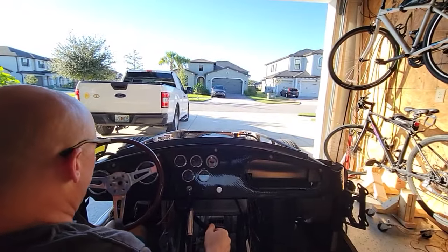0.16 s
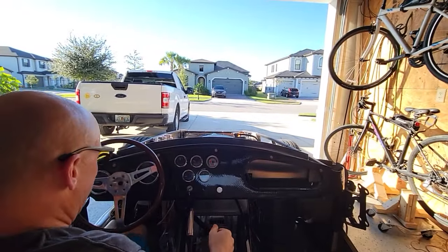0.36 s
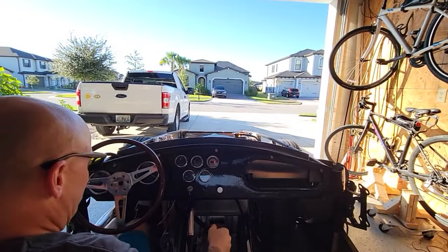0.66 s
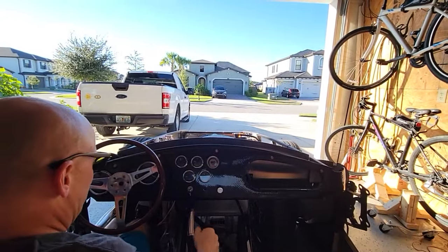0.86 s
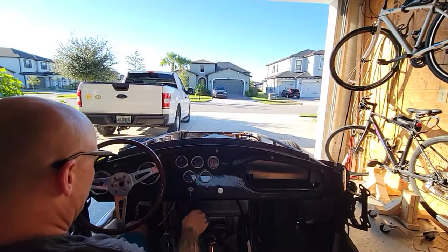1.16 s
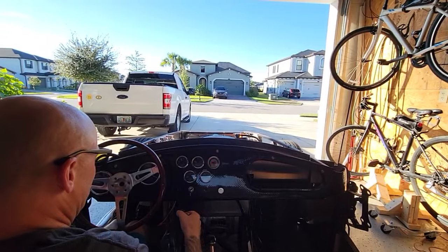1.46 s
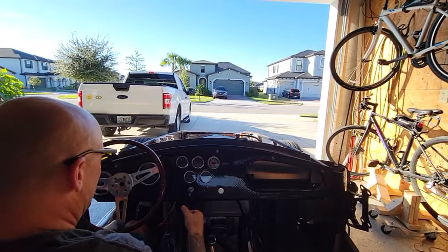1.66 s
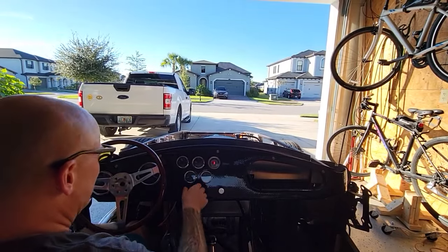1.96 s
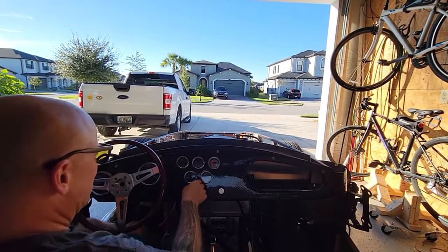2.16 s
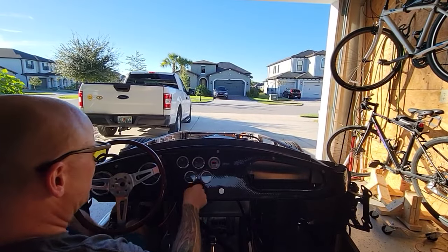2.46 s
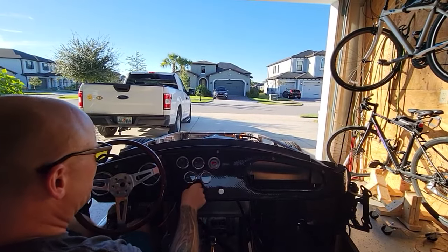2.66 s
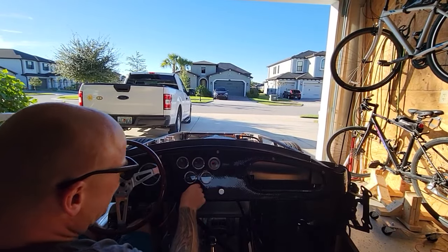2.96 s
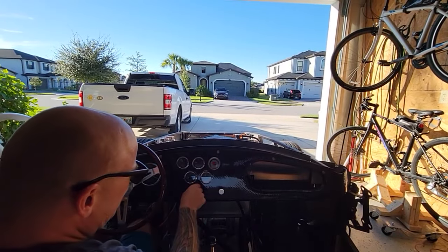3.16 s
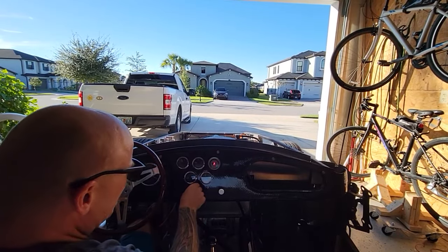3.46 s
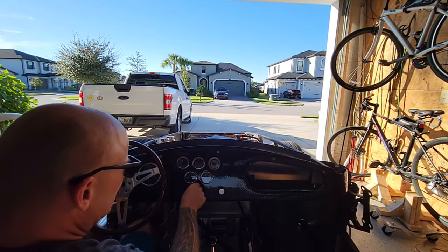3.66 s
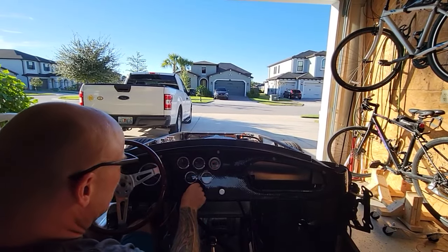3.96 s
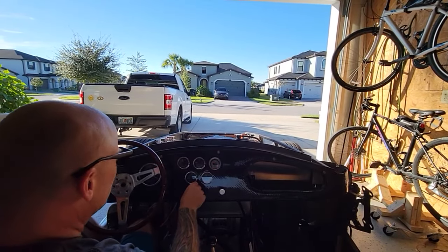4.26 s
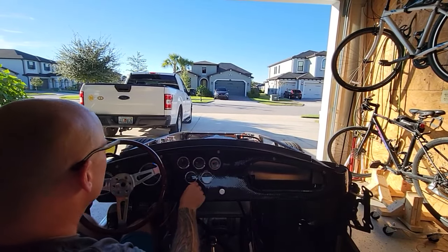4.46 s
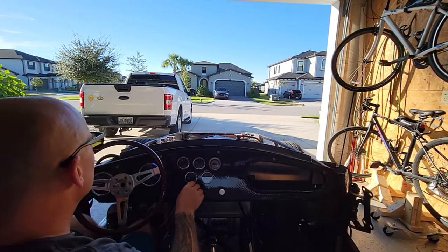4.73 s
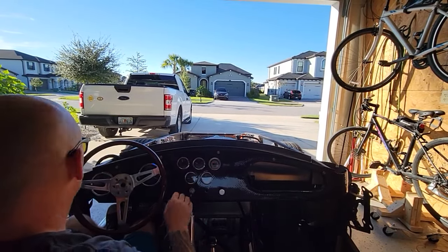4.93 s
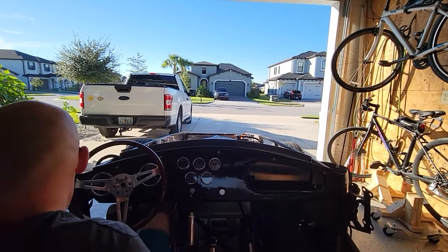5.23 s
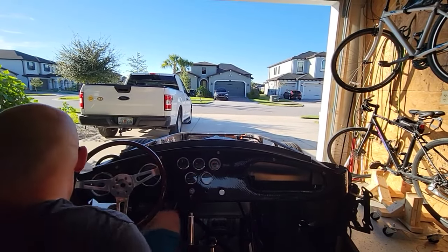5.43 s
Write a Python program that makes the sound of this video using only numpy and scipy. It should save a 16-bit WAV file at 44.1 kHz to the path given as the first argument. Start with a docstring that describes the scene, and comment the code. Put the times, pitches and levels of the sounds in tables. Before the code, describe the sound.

Uneven low engine idle with valve clatter and hiss, a sharp lever clack and quick ratchet clicks, then shut-off, sinking shudder and near quiet.

```python
"""A small open car idles in a garage with the lope of an eight-cylinder engine, heard from behind the seats:
uneven puffs ring a pipe and the walls, and noise pulsing with them makes valve clatter and intake hiss.
A lever clacks and the handbrake ratchets on, each contact a short burst of shaped noise.
The ignition is cut: dull puffs slow down, a drone sinks, the body shudders, with thin squeaks and a dull knock.
A fan's blade tones coast on over the street's soft noise, which lies under everything from the start."""
import sys
import numpy as np
from scipy import signal
from scipy.fft import rfft, irfft, next_fast_len
from scipy.io import wavfile
from scipy.ndimage import map_coordinates

SR = 44100
rng = np.random.default_rng(int(sys.argv[2]) if len(sys.argv) > 2 else 0)


def wrap_up_sound(samples):
    """Save the sound to the file named by the first command line argument, as 16-bit audio."""
    columns = np.atleast_2d(samples).T
    # keep every value between -1 and 1, then stretch to whole-number steps
    tamed = np.clip(columns, -1, 1)
    steps = np.round(tamed * 32767).astype(np.int16)
    wavfile.write(sys.argv[1], SR, steps)


N = 246500

# Engine speed: the idle hunts a little: start_s, crankshaft_rpm
IDLE_SPEED = [(0, 1075), (.6, 1148), (1.55, 1147), (1.8, 1161), (2.2, 1150), (2.5, 1072), (2.85, 1152),
              (3.6, 1173), (3.95, 1207)]
IDLE_RPM = 1150  # the speed that levels are compared with
CUT_S = 4.136  # the ignition is switched off
DRAG_PER_S, FRICTION_RPM_PER_S = 1.55, 570  # what slows the dead engine
STALL_S, STALL_TAKES_S = 4.87, 0.072  # a last compression stops it

# Cylinders in firing order: relative_puff_strength_db, lateness_at_pipe_end_ms
CYLINDERS = [(-5.7, .2), (.4, 2.7), (-6.4, 2.2), (-3.6, 2.2), (3, 3.2), (-8.8, -2.6), (.6, 2.1), (-.5, 3.1)]
# Turning slowly, the cylinders lose their pressure: crankshaft_rpm, puff_change_db
PRESSURE_LEAK = [(325, -23), (385, 0)]
PUFF_DB_PER_DECADE = 4  # puffs weaken as the speed falls (a decade is a factor of ten)
UNFIRED_DB = -2.5  # and weaken once more when the ignition is off
BURN, AIR_SHARPNESS = 0.9, 0.37  # sharpness of fired and of unfired puffs, 0 to 1
BURN_OUT_S = .022  # how fast the burn dies

# Tone of the exhaust pipe and muffler: pitch_hz, relative_level_db
PIPE_TONE = [(8, -47), (28, -22.5), (48, -7.5), (77, 1), (108, 1.5), (150, 3), (208, -5), (262, -23.5),
             (350, -16), (480, -22), (590, -30), (690, -29.5), (770, -44), (2000, -52)]
# Bands that the room holds back: centre_hz, width_hz
ROOM_DELAYS = [(32, 21), (75, 11), (160, 7.9), (310, 24), (350, 49), (370, 32), (400, 28.5), (470, 43),
               (560, 36), (690, 16)]
# The garage and body panels ring: centre_hz, width_hz, level_db
BOOM = [(111, 1.9, -2), (380.4, 20, 0.5), (489.4, 22, 0.5), (647, 27, -14)]
# Share of the exhaust that echoes in from the sides: pitch_hz, level_db
SIDE_ECHO = [(30, -40.5), (70, -23), (120, -26.5), (250, -17), (500, -8), (1000, 5)]
# How long the garage rings: pitch_hz, time_to_fall_60_db_s
GARAGE_DECAY = [(100, 0.51), (1000, 0.23), (5000, 0.24), (14000, 0.094)]

# Engine bay level at the reference idle speed, before the offsets below: start_s, level_db
BAY_LEVEL = [(0, -37), (.75, -37.5), (1.7, -38.5), (2.4, -37.5), (3.7, -36), (4.2, -36.2)]
CLATTER_DB, HISS_DB = 4, 4  # over that level
CLATTER_DB_PER_DECADE, HISS_DB_PER_DECADE = 14.5, 17  # both fall with the speed
# Colour of the valve clatter: pitch_hz, relative_level_db (per Hz)
CLATTER_COLOUR = [(300, 11.5), (560, 0), (680, 12.5), (780, -7), (880, -2), (1250, -8), (1750, 1.5),
                  (2500, -2), (3500, -4), (4500, -5), (6500, -7), (9000, -32), (16000, -40)]
# Colour of the intake hiss: pitch_hz, relative_level_db (per Hz)
HISS_COLOUR = [(4000, -19.5), (6500, -11), (7800, -5), (9100, -2.5), (10800, -6), (11800, -4), (12700, 0),
               (13800, -4.5), (15000, -11), (16000, -12.5)]
# Which side the engine leans to: pitch_hz, left_minus_right_db
SIDES = [(60, 0), (92, -1.5), (140, 2), (210, -6), (330, 3.5), (500, -6.5), (770, -3.5), (1170, -3),
         (1790, -2.5), (2740, 0), (4190, -3), (6410, -2.5), (9810, 3.5), (15000, -3.5)]

# Body resonances that the sinking drone sweeps through: centre_hz, width_hz, level_db
BODY = [(101.9, 11.3, -12), (71.6, 16, -24), (36.5, 16, -33)]
# The dying engine kicks its mounts and rocks back: start_s, level_db
JOLTS = [(4.235, -20.5), (4.365, -20), (4.486, -19), (4.545, -25.5), (4.63, -18.5), (4.83, -38.5),
         (4.93, -44)]
JOLT_RISE_S = 0.022  # the shudder swells this long, then dies away
SHUDDER_HZ = 109.2  # the body rocking on its frame
# Thin tones of the accessories: pitch_hz, relative_level_db
WHINES = [(704, -48.5), (906, -64.5), (1615, -66), (1742, -55.5), (4158, -69), (8914, -65), (9632, -66)]

# Lever contacts: start_s, relative_level_db, centre_hz, width_octaves, time_to_fall_60_db_s
LEVER_CLICKS = [(.879, -20, 12800, .15, 0.054), (.896, -11, 5000, 0.66, 0.037),
                (0.906, -18.5, 4850, 0.88, 0.06), (0.917, -23, 3500, 0.8, 0.048),
                (.926, -29, 2900, 0.45, 0.046), (1.028, -24.5, 7260, 0.047, 0.052),
                (1.139, -24, 12900, .1, 0.12)]
# The lever's steel rings: pitch_hz, relative_level_db
STEEL_RING = [(2300, 2), (2710, 2), (3110, 0), (4130, 1), (4610, 4), (5400, 1), (7300, -1.5), (9040, 2)]
# The handbrake pawl jumps over teeth: start_s, relative_level_db
TEETH = [(1.422, -12.5), (1.4438, -12), (1.4635, -11.5), (1.485, -12), (1.5089, -10.5), (1.5609, -11)]
# Colour of each pawl click: pitch_hz, relative_level_db (per Hz)
PAWL_COLOUR = [(400, -9), (750, -7), (930, 6.5), (1150, -12), (1500, -1), (2500, -14), (3500, -12),
               (4600, -6.5), (6300, -11), (8500, 1.5), (13000, 2), (16000, -8)]
# The stopping engine: a thin belt squeak, a dull broad knock, another thin belt squeak:
# start_s, relative_level_db, centre_hz, width_octaves, time_to_fall_60_db_s
STOP_SOUNDS = [(4.723, -43.5, 8300, 0.07, 0.24), (4.741, -47, 2300, 1.0, 0.073),
               (4.91, -64, 8920, .015, .3)]

FAN_HZ, FAN_DRAG_PER_S = 254, .33  # blade rate when the engine stalls, and how fast it sinks
# Level of the blade tones: start_s, level_db
FAN_LEVEL = [(4.75, -63), (5.03, -54), (5.3, -47.5), (5.45, -58), (5.59, -51)]
# Overtones of the blade rate: multiple (no unit), relative_level_db
BLADE_TONES = [(1, -1.5), (2, -0.5), (3, -10)]

# Street noise: start_s, rumble_level_db, relative_rush_level_db
STREET_LEVEL = [(4.8, -43, -56), (4.95, -44.5, -55.5), (5.1, -47, -58), (5.34, -47.5, -58.5),
                (5.42, -48.5, -58.5), (5.59, -59, -60)]
# Colour of the rumble: pitch_hz, relative_level_db (per Hz)
RUMBLE_COLOUR = [(15, -32), (30, -10), (65, -2), (105, -2), (170, -10), (240, -6), (320, -16.5), (450, -16),
                 (700, -15.5), (1200, -70)]
# Colour of the rush of air: pitch_hz, relative_level_db (per Hz)
RUSH_COLOUR = [(180, -14), (400, 0), (700, -5), (870, -3), (1100, -5.5), (2000, -15), (4500, -17.5),
               (6500, -23.5), (9000, -25), (15500, -34)]
TOP_HZ = 15900  # nothing is kept from here up


def speed():
    """Crankshaft rpm: the idle, then a coast against drag and friction until the stall."""
    brake_rpm = FRICTION_RPM_PER_S / DRAG_PER_S
    coast = (curves(IDLE_SPEED)[0] + brake_rpm) * np.exp(-DRAG_PER_S * since(CUT_S)) - brake_rpm
    stalling = np.clip(1 - since(STALL_S - STALL_TAKES_S) / STALL_TAKES_S, 0, 1)
    return np.maximum(coast, 0) * stalling


def by_speed(db_per_decade):
    """Level in dB, relative to idle, of a sound that grows with the speed."""
    return db_per_decade * np.log10(speed() / IDLE_RPM + 1e-4)


def sharpness():
    """The burn dies at the cut and leaves dull puffs of air, ever duller as the engine slows."""
    alight = np.exp(-since(CUT_S) / BURN_OUT_S)
    return BURN * alight + AIR_SHARPNESS * (1 - alight) * speed() / IDLE_RPM


def firings(scatter, rebound, jitter_ms):
    """Four puffs a turn, each cylinder with its own strength and delay; a strong one tends to follow a weak."""
    rpm = speed()
    puff_count = np.cumsum(rpm) * 4 / 60 / SR
    at = np.flatnonzero(np.diff(np.floor(puff_count)))  # samples where a puff starts
    cylinder = np.arange(len(at)) % len(CYLINDERS)
    cylinder_db, late_ms = np.array(CYLINDERS)[cylinder].T
    effort_db = by_speed(PUFF_DB_PER_DECADE) + UNFIRED_DB * (since(CUT_S) > 0)
    leak_db = np.interp(rpm[at], *np.transpose(PRESSURE_LEAK))
    luck = rng.uniform(-1.27, 1, len(at))
    chance = np.abs(1 + scatter * sharpness()[at] * (luck - rebound * np.roll(luck, 1)))
    strength = amp(cylinder_db + effort_db[at] + leak_db) * chance
    delay = (late_ms + jitter_ms * rng.standard_normal(len(at))) * SR / 1000
    return np.bincount(np.abs(at + delay).astype(int), strength, N)[:N]


def exhaust(puffs, level_db, soft_hz):
    """Puffs ring the pipe and the garage; without combustion they are soft gulps of air."""
    soft = filtered(puffs, lambda hz: 1 / (1 + (hz / soft_hz) ** 4))
    blown = soft + sharpness() * (puffs - soft)
    cycle = round(120 * SR / IDLE_SPEED[0][1])  # two turns
    blown = np.r_[blown[:cycle], blown[:cycle], blown]  # the engine has been running for a while
    pipe = amp(level_db) * filtered(blown, lambda hz: causal(amp(along(PIPE_TONE, hz))))
    # the way round the walls delays some bands, so that the puffs melt into a rumble
    pipe = filtered(pipe, lambda hz: np.prod([1 - 2 * resonance(hz, c, w) for c, w in ROOM_DELAYS], axis=0))
    pipe = pipe[-N:]
    direct = filtered(pipe, lambda hz: 1 + resonances(hz, BOOM))
    side = filtered(garage(direct)[0], lambda hz: amp(along(SIDE_ECHO, hz)))
    return np.array([direct + side, direct - side])


def engine_bay(puffs, tick_s, tick_depth, gulp_depth):
    """Valve gear ticks in step with the firings, and the intake hisses in gulps; both follow the speed."""
    bay_db, = curves(BAY_LEVEL)
    clatter_db = bay_db + CLATTER_DB + by_speed(CLATTER_DB_PER_DECADE) + 0.6 * wobble(17)
    hiss_db = bay_db + HISS_DB + by_speed(HISS_DB_PER_DECADE) + 0.19 * wobble(15)
    # each puff starts a beat that dies away over tick_s
    beat = unit(signal.lfilter([1], [1, -np.exp(-1 / (tick_s * SR))], puffs))
    clatter = panels(noise(lambda hz: along(CLATTER_COLOUR, hz), common=0.2), strength=0.13)
    clatter = clatter * (1 + tick_depth * beat)
    hiss = panels(noise(lambda hz: along(HISS_COLOUR, hz), common=0.018), strength=0.2)
    hiss = hiss * (1 + gulp_depth * beat)
    return amp(clatter_db) * unit(clatter) + amp(hiss_db) * unit(hiss)


def panels(x, strength, count=8):
    """Weak reflections off the nearby bodywork put a fine ripple on the spectrum."""
    lags = rng.integers(SR // 1000, SR // 80, count)
    return x + strength * sum(np.roll(x, lag, axis=1) for lag in lags)


def rundown(onset_s):
    """The dead engine pumps air in a drone sinking through body resonances; each jolt makes the body shudder."""
    turns = np.cumsum(speed()) / 60 / SR
    pumping = np.sin(2 * np.pi * len(CYLINDERS) * turns)
    pumping = pumping * np.tanh(speed() / 100) * np.tanh(since(CUT_S) / onset_s)
    drone = filtered(pumping, lambda hz: resonances(hz, BODY))
    swell = 0
    for s, db in JOLTS:
        age = since(s) / JOLT_RISE_S
        swell = swell + amp(db) * age * np.exp(1 - age)
    shudder = swell * np.sin(2 * np.pi * np.cumsum(SHUDDER_HZ + 1.79 * wobble(12)) / SR)
    return np.sqrt(2) * (drone + shudder)


def whines(level_db, waver):
    """Thin, wavering tones of the accessories, which fade once the ignition is off."""
    running = curves([(4.3, 1), (4.8, 0)])[0]
    tones = np.zeros(N)
    for hz, db in WHINES:
        phase = 2 * np.pi * np.cumsum(hz + waver * np.sqrt(hz) * wobble(25.17)) / SR
        tones += amp(db + 2.3 * wobble(8)) * np.sin(phase)
    return amp(level_db) * running * (tones + .5 * garage(tones))


def controls():
    """The lever clacks home and rings; the handbrake's pawl jumps from tooth to tooth."""
    out, t = np.zeros((2, N)), np.arange(SR // 2) / SR
    for s, db, hz, octaves, t60 in LEVER_CLICKS:
        add(out, s, amp(db - 4.5) * burst(hump(hz, octaves), t60, attack=0.00045))
    clack_s = LEVER_CLICKS[1][0]
    ring = sum(amp(db) * np.sin(2 * np.pi * (hz * t + rng.random((2, 1)))) for hz, db in STEEL_RING)
    add(out, clack_s, amp(-17.5) * unit(ring) * np.exp(-t / 0.0082))
    bracket_knock = burst(hump(centre_hz=1520, octaves=0.6), t60=0.064, attack=0.0013)
    add(out, clack_s, amp(-30.5) * bracket_knock)
    for s, db in TEETH:
        click = burst(lambda hz: along(PAWL_COLOUR, hz), t60=0.084, attack=0.0011)
        add(out, s - .001, amp(db - 5.0) * click)
        floor_pan = burst(hump(centre_hz=1030, octaves=0.84), t60=0.15, attack=0.0045)  # it answers
        add(out, s, amp(db - 18) * floor_pan)
    return out + amp(-4.5) * garage(out)


def stop_sounds():
    """Sounds of the stopping engine: thin belt squeaks from narrow noise, and a dull knock from broad noise."""
    out = np.zeros((2, N))
    for s, db, hz, octaves, t60 in STOP_SOUNDS:
        add(out, s, amp(db + 7.5) * burst(hump(hz, octaves), t60, attack=0.0039))
    return out


def fan():
    """The blade tones sink as the fan coasts against the air, wavering in the room."""
    blade_hz = FAN_HZ * np.exp(-FAN_DRAG_PER_S * since(STALL_S))
    phase = 2 * np.pi * np.cumsum(blade_hz * (1 + .04 * wobble(50))) / SR
    blades = sum(amp(db + 4.1 * wobble(14)) * np.sin(k * phase) for k, db in BLADE_TONES)
    tone = amp(curves(FAN_LEVEL)[0]) * blades
    return tone + amp(-12.5) * garage(tone)


def street():
    """Low rumble and a soft rush of air at the open door, both made of shaped noise."""
    rumble_db, rush_db = curves(STREET_LEVEL)
    rumble = amp(rumble_db) * noise(lambda hz: along(RUMBLE_COLOUR, hz), common=1.0)
    rush = amp(rush_db + 6.0) * noise(lambda hz: along(RUSH_COLOUR, hz), common=0.13)
    return rumble + rush


def garage(x):
    """The walls' answer, different on each side: noise that dies away at its own pace at each pitch."""
    hz, t, z = signal.stft(rng.standard_normal((2, SR // 2)), SR, nperseg=256)
    decay = amp(-60 * t / along(GARAGE_DECAY, hz)[:, None])
    tail = signal.istft(z * decay, SR, nperseg=256)[1]
    return signal.fftconvolve(np.atleast_2d(x), tail / np.linalg.norm(tail[0]), axes=1)[:, :N]


def amp(db):
    """Decibels to gain."""
    return 10 ** (np.asarray(db) / 20)


def unit(x):
    """Scale to an average (rms) strength of 1."""
    return x / np.sqrt(np.mean(x ** 2) + 1e-20)


def along(points, hz):
    """Read (Hz, value) points on a log pitch axis."""
    f, v = np.transpose(points)
    return np.interp(np.log(hz + 1), np.log(f + 1), v)


def curves(rows):
    """One value per sample for each column after the time."""
    s, *cols = np.transpose(rows)
    return [np.interp(np.arange(N) / SR, s, c) for c in cols]


def since(s):
    """Seconds gone by since a moment, zero before it."""
    return np.maximum(np.arange(N) / SR - s, 0)


def wobble(rate):
    """A smooth random curve through this many random points a second."""
    points = rng.standard_normal(int(N * rate / SR) + 4)
    return map_coordinates(points, [np.arange(N) * rate / SR])


def filtered(x, response):
    """x passed through a complex response of frequency."""
    n = x.shape[-1]
    m = 2 * next_fast_len(n // 2 + SR // 4)  # room for the ringing
    return irfft(rfft(x, m) * response(np.fft.rfftfreq(m, 1 / SR)), m)[..., :n]


def resonance(hz, centre_hz, width_hz):
    """The response of one simple resonance, with gain 1 at its centre."""
    damping = 1j * hz * width_hz
    return damping / (centre_hz ** 2 - hz ** 2 + damping)


def resonances(hz, rows):
    """Resonances side by side, each with its level."""
    return sum(amp(db) * resonance(hz, centre, width) for centre, width, db in rows)


def causal(gain):
    """The response with this gain that rings only after the hit (minimum phase)."""
    cepstrum = irfft(np.log(gain))
    half = len(cepstrum) // 2
    return np.exp(rfft(np.r_[cepstrum[0], 2 * cepstrum[1:half], cepstrum[half]], 2 * half))


def noise(shape_db, common=0.033, size=N):
    """Stereo noise of rms 1 with a spectrum in dB; a share (0 to 1) is common to both sides."""
    white = rng.standard_normal((3, size))
    mixed = np.sqrt(1 - common) * white[:2] + np.sqrt(common) * white[2]
    return unit(filtered(mixed, lambda hz: amp(shape_db(hz))))


def burst(shape_db, t60, attack):
    """A dense cluster of resonances, excited and dying away: shaped noise under a fading curve."""
    t = np.arange(SR // 2) / SR
    return noise(shape_db, size=SR // 2) * amp(-60 * t / t60) * (1 - np.exp(-t / attack))


def hump(centre_hz, octaves):
    """A bell-shaped spectrum in dB."""
    return lambda hz: -10 * np.log10(1 + (np.log2((hz + 1) / centre_hz) / octaves) ** 4)


def add(track, s, sound):
    """Mix a stereo sound in at a time in seconds."""
    room_left = track[:, round(s * SR):]
    room_left[:, :sound.shape[1]] += sound[:, :room_left.shape[1]]


def scene():
    """The engine, leaning to one side or the other by band, with the controls and the quiet behind it."""
    puffs = firings(scatter=0.43, rebound=0.86, jitter_ms=0.37)
    engine = exhaust(puffs, level_db=32, soft_hz=221)
    engine = engine + engine_bay(puffs, tick_s=0.017, tick_depth=0.21, gulp_depth=0.21)
    engine = filtered(engine, lambda hz: amp(np.outer([.5, -.5], along(SIDES, hz))))
    engine = engine + rundown(onset_s=0.14) + whines(level_db=-0.5, waver=0.11)
    return engine + controls() + stop_sounds() + fan() + street()


def record(dry):
    """Keep only what lies below the band limit."""
    return filtered(dry, lambda hz: hz < TOP_HZ)


dry = scene()
out = record(dry)
wrap_up_sound(out)
```